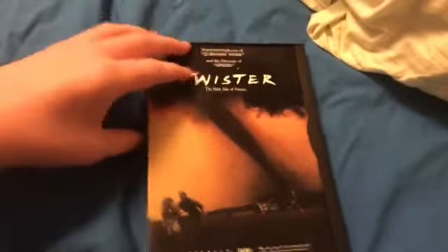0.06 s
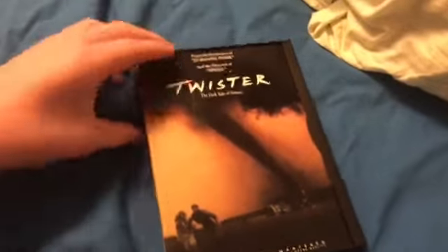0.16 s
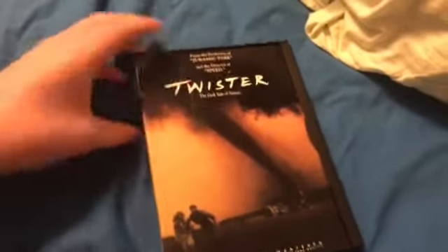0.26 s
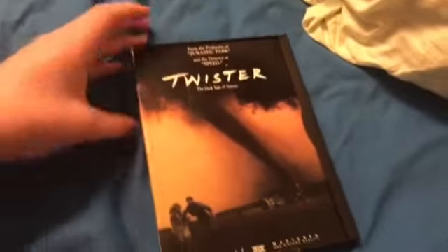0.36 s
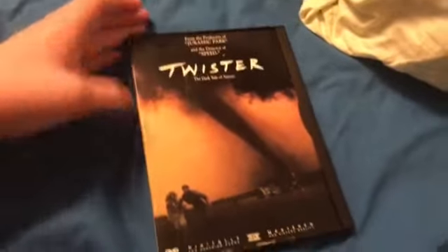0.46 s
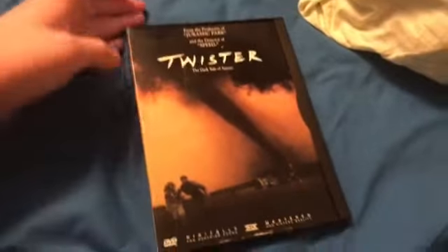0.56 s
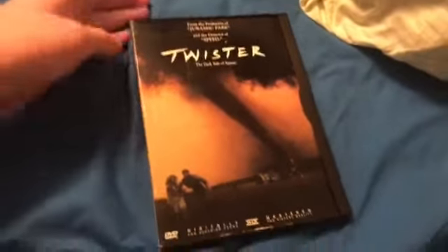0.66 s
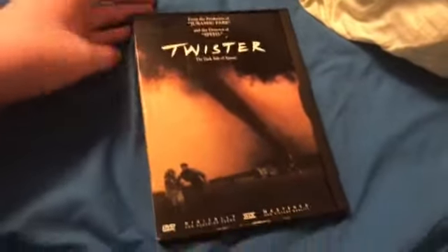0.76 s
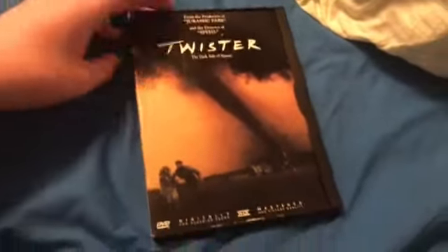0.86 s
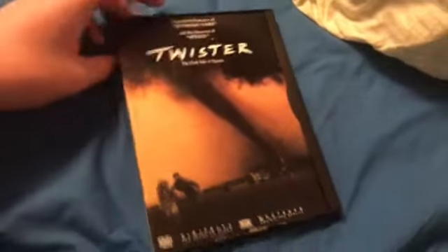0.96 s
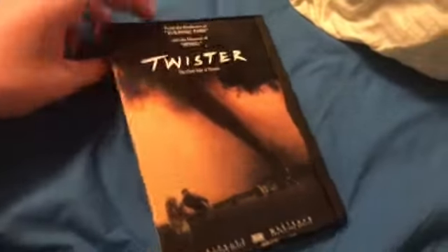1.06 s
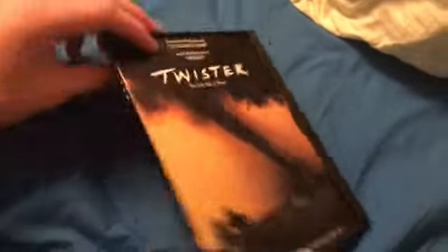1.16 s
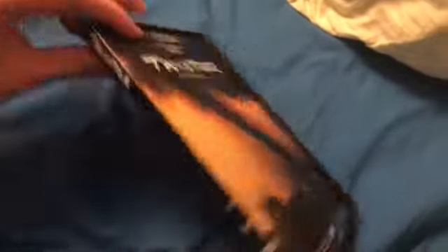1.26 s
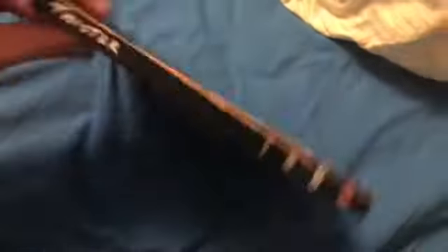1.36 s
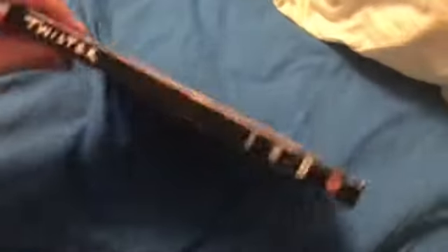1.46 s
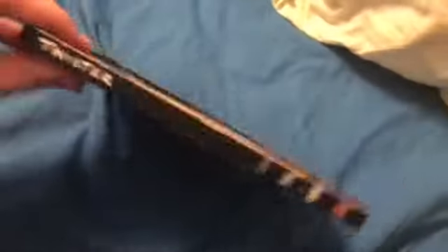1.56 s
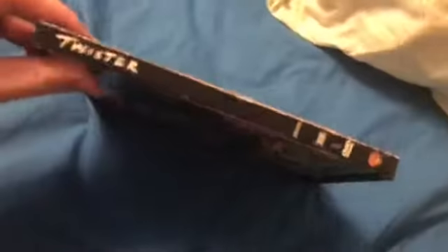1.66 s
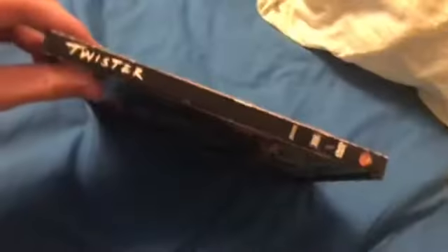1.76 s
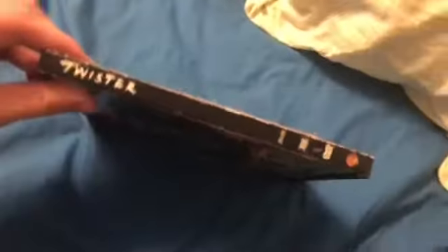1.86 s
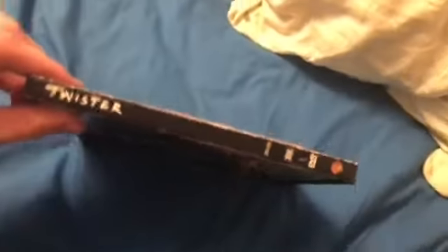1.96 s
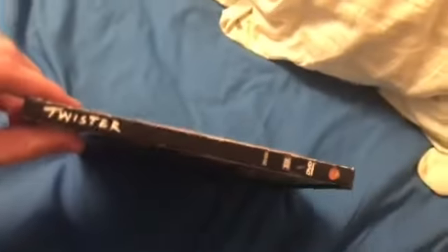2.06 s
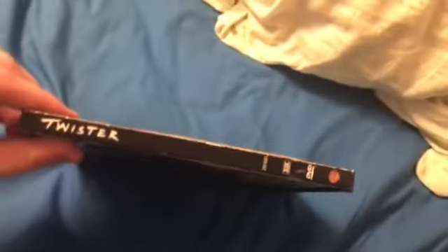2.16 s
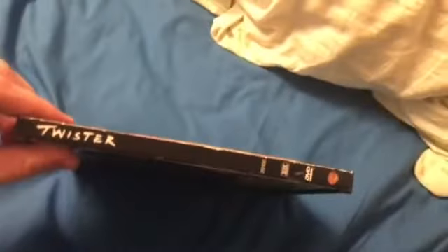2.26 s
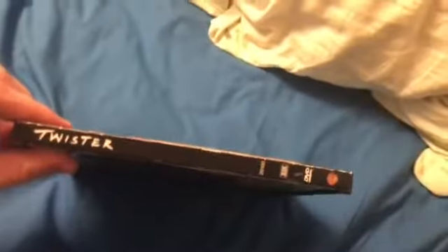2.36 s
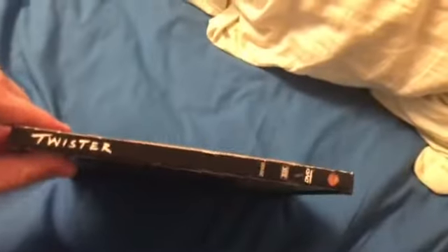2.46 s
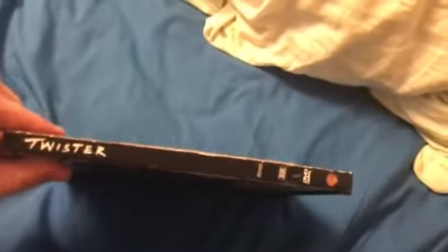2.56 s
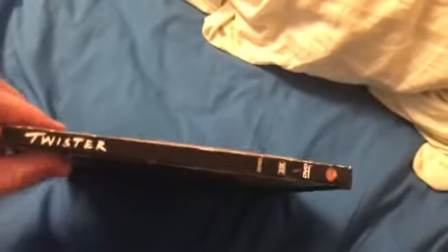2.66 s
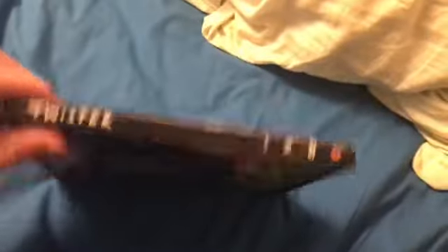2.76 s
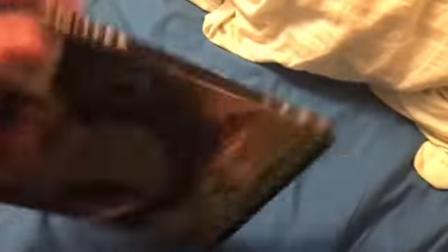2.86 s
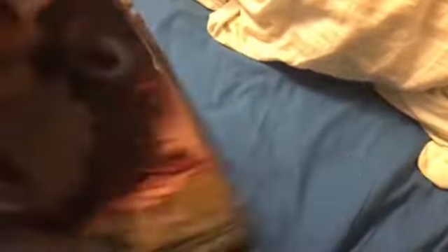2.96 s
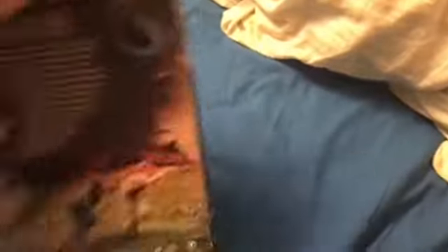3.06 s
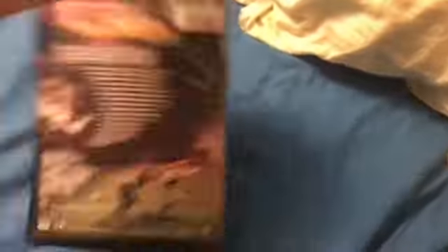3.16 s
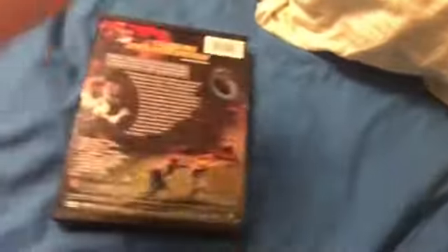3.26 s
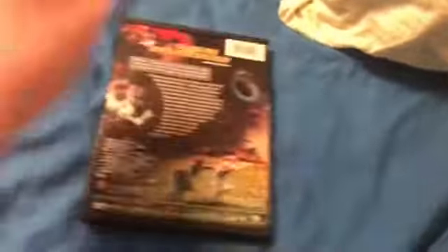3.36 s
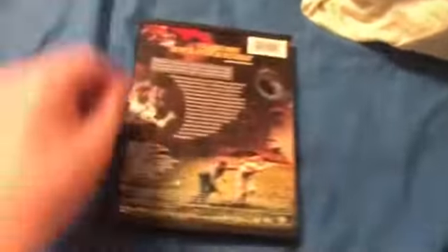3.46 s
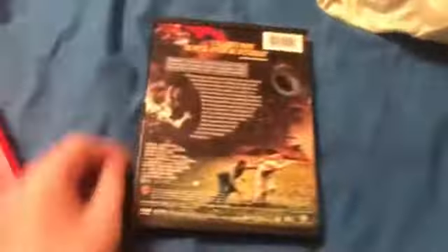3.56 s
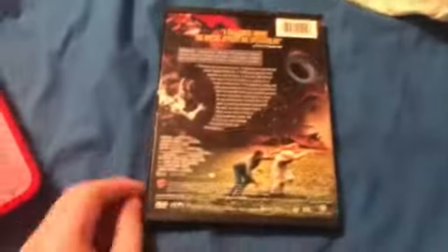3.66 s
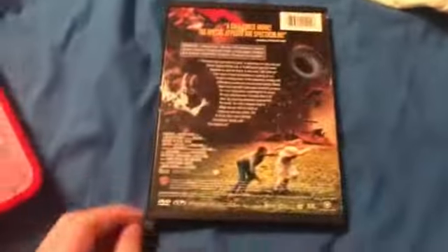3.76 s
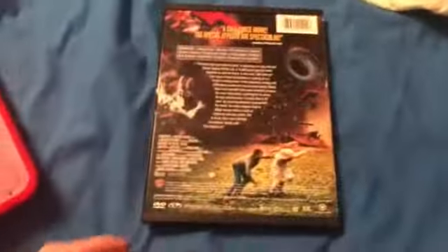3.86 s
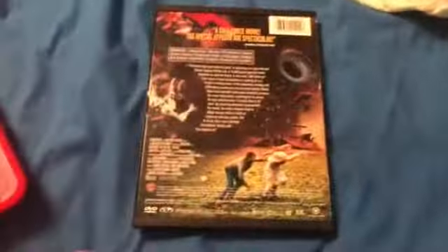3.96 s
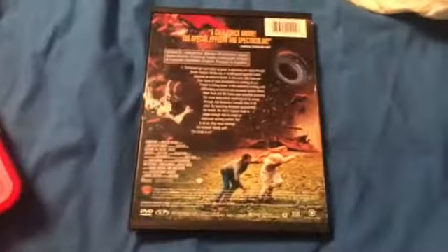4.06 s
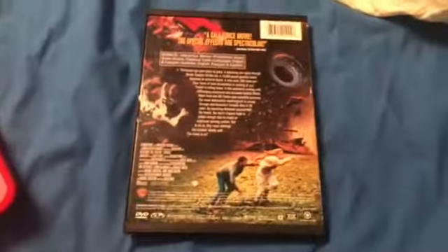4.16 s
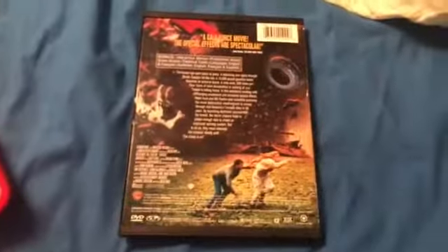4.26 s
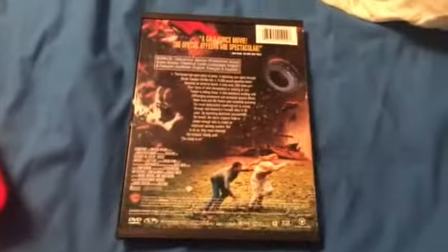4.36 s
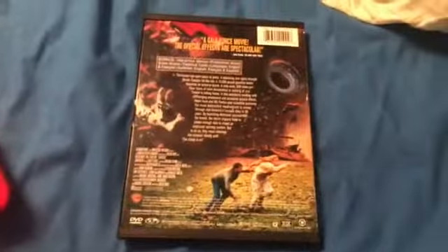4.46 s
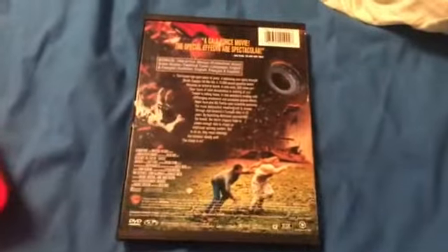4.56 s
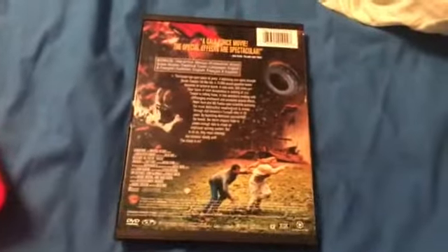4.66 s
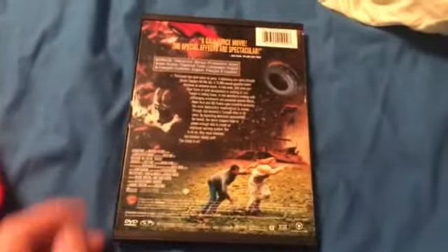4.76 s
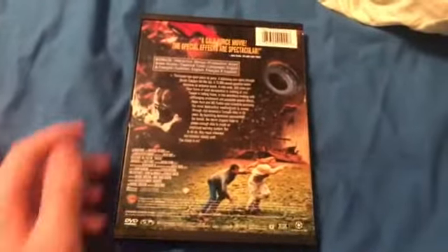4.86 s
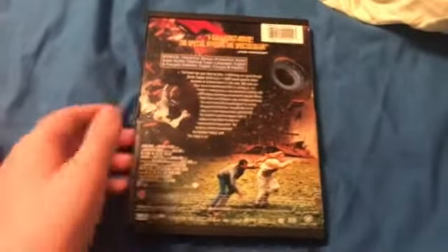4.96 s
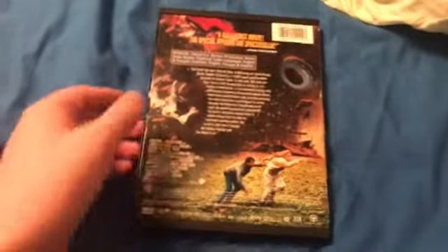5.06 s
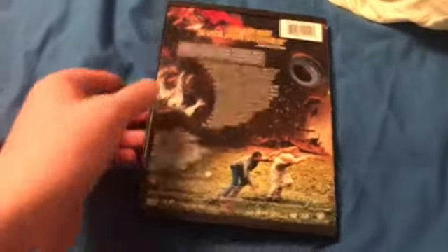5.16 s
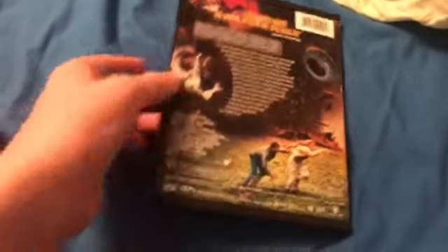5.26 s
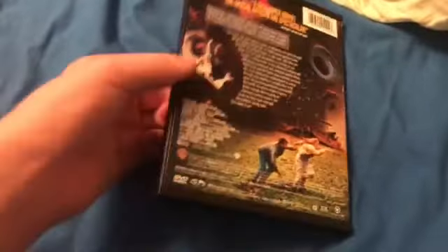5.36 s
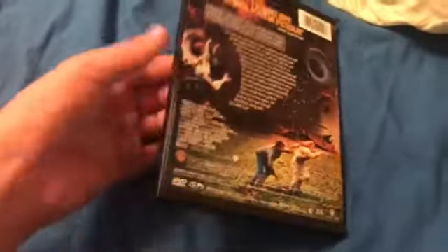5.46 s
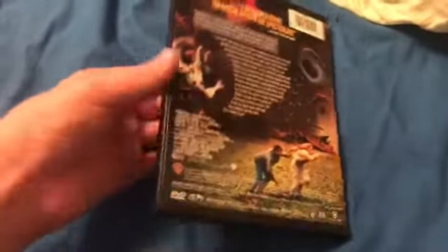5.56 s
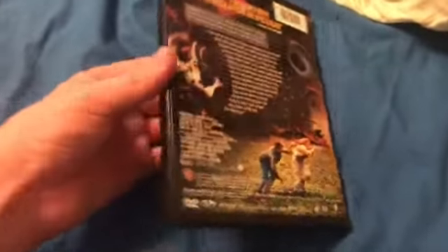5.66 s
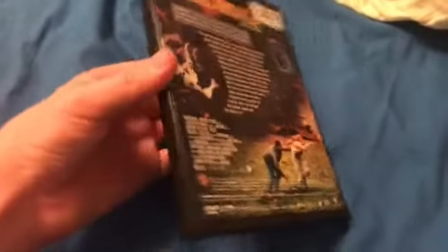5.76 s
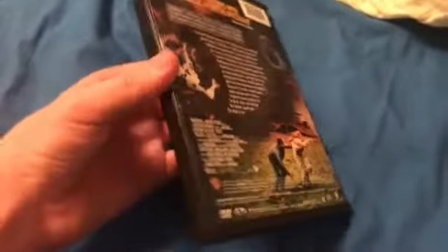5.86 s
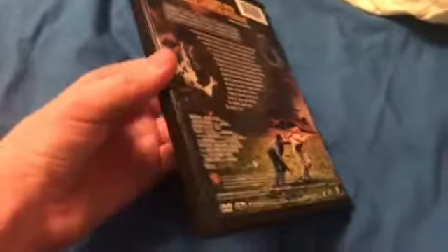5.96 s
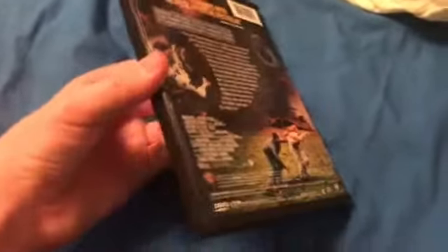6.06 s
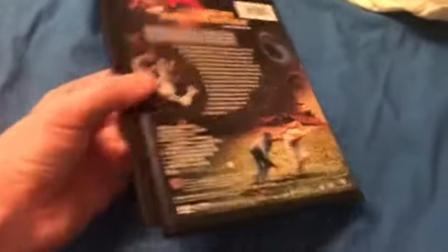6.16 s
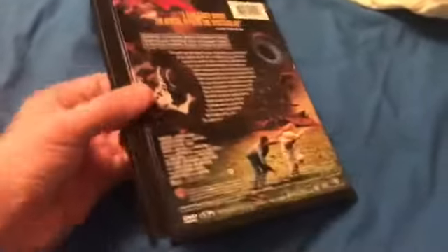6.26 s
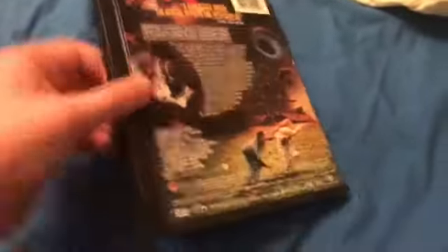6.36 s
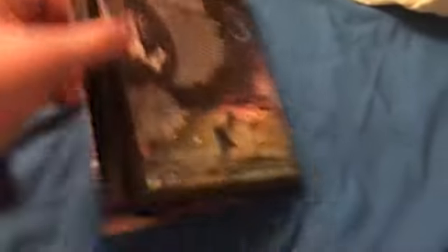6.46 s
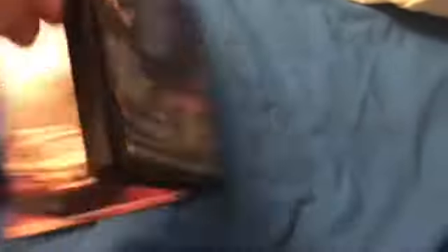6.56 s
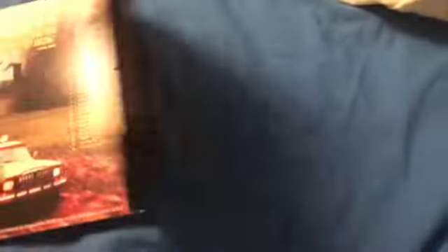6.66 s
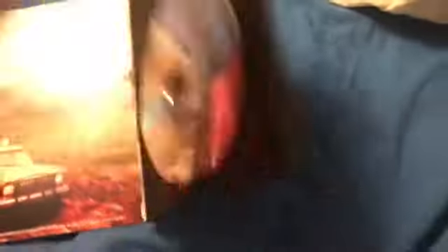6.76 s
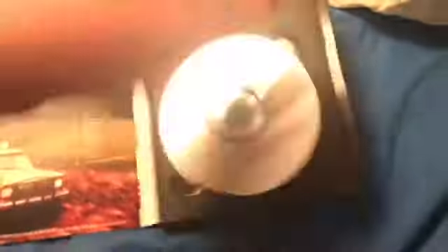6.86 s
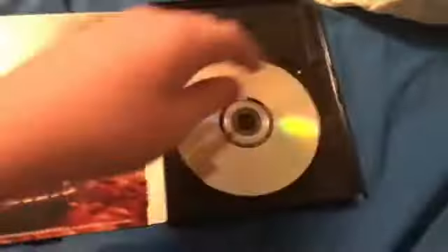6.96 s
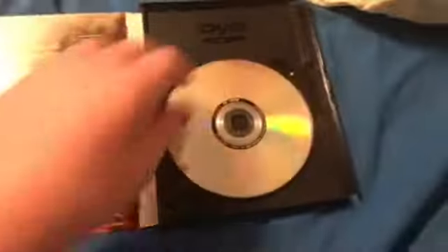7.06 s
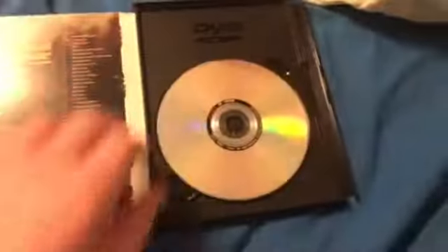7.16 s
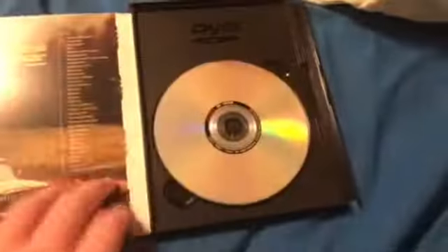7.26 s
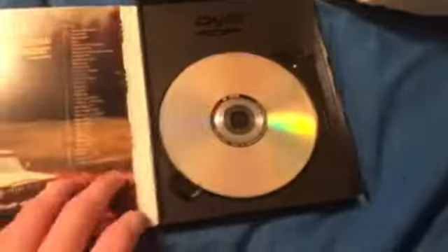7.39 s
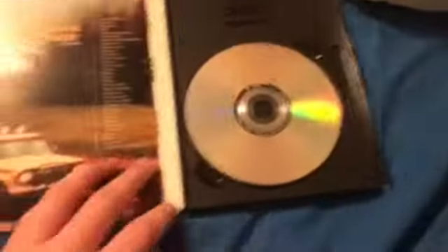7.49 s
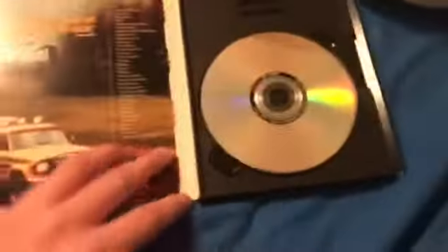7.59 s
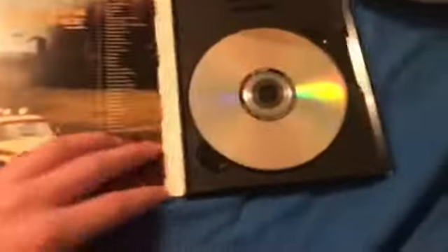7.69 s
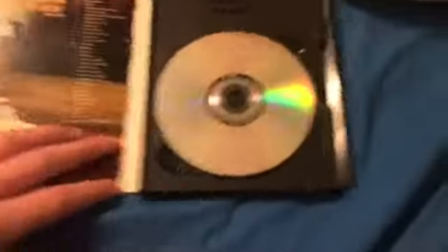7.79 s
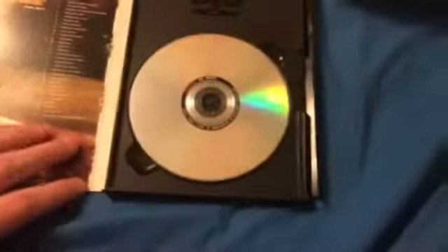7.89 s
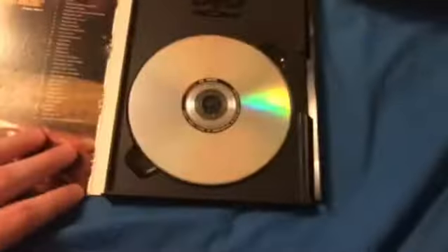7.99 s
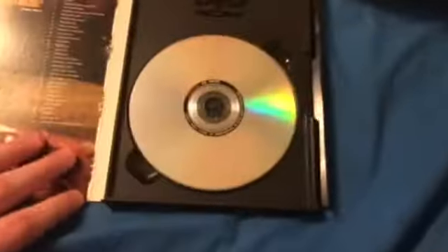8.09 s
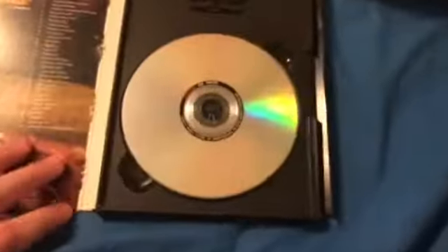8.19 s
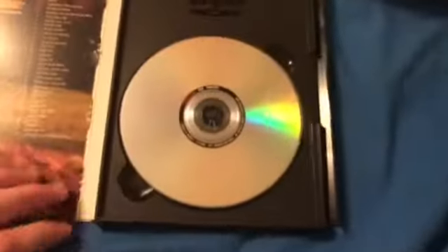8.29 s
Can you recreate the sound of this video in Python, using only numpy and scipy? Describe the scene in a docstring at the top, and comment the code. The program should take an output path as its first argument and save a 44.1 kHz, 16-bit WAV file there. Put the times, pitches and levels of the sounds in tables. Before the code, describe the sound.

Close-miked in a small soft room with faint low rumble, fingers brush a hollow plastic case on a blanket. Light clicks mark it being tilted; it flips and lands with a clack and padded thump. After a pause and more gritty rubbing, the clasp cracks open loudly. The cover flops back with clatter, the disc knocks briefly on its hub, and quiet rustles and small taps finish.

```python
"""In a small, soft, quiet room with a low rumble, a plastic disc case is handled close by on a blanket.
It is picked up, turned over, dropped and snapped open; the cover flops back and loose parts tick.
Rubbing is made from random trains of tiny slips, filtered and swelling with each hand movement.
Ticks and the clasp are short bursts of noise plus ringing plastic; landings are low swings that die away.
The disc is a set of fading sine waves. A short echo surrounds the handling; filtered noise is the room."""
import sys
import numpy as np
from scipy import signal
from scipy.io import wavfile
from scipy.ndimage import uniform_filter1d

SR = 44100
rng = np.random.default_rng(int(sys.argv[2]) if len(sys.argv) > 2 else 0)


def to_wav(s):
    """Save 16-bit WAV."""
    ch = np.atleast_2d(s).T  # columns
    pcm = np.round(np.clip(ch, -1, 1) * 32767)  # PCM
    wavfile.write(sys.argv[1], SR, pcm.astype(np.int16))


N = 367367

# All levels in the tables are relative: the functions may add an overall level.
# Still room, colour of its noise: (frequency [Hz], level [dB])
AIR_COLOUR = [(12, -52), (22, -25.5), (40, -16.5), (64, 1.5), (120, -5), (171, -15), (213, -17), (320, -18),
              (505, -24.5), (857, -25.5), (1400, -29), (1900, -32), (4000, -33), (7500, -38), (9000, -35.5),
              (10400, -40.5), (12500, -37), (15500, -39.5)]
# Hand movements: (start [s], length [s], fastest moment [share of length],
#                  cloth level [dB], skin on shell level [dB])
HAND_MOVES = [(0.0, .72, 0.017, -74.5, -66.5), (0.103, 0.12, 0.28, -60.3, -57),
              (0.517, .83, 0.81, -70.5, -64), (0.954, .122, 0.66, -63, -62),
              (1.145, 0.093, .4, -66.5, -50.5), (1.203, 0.29, .3, -65.5, -62),
              (1.437, 0.49, 0.81, -79, -73), (1.591, 0.14, 0.44, -66.5, -58.5),
              (1.95, 0.23, 0.59, -81.5, -70.5), (2.763, 0.3, 0.28, -67, -61.5),
              (2.989, 0.16, 0.81, -67, -57), (3.169, 0.07, 0.63, -66, -50.5),
              (3.246, 0.11, 0.21, -69.5, -49.5), (3.523, 0.58, 0.35, -71, -65.5),
              (4.655, 0.2, 0.82, -74.5, -66), (4.917, 0.26, 0.17, -69, -58.5),
              (5.119, 0.42, 0.21, -70.5, -59), (5.522, 0.42, 0.32, -72.5, -70),
              (5.901, 0.16, .2, -80, -63.5), (6.026, 0.66, 0.64, -66.5, -63.8),
              (6.598, 0.17, 0.12, -65.5, -65), (6.772, 0.28, 0.28, -70.5, -58.5),
              (7.336, 0.38, 0.52, -63, -71), (7.667, .32, 0.45, -61, -71), (7.76, 0.62, 0.92, -74.5, -70.5)]
# Hands leaning on the mattress: (start [s], length [s], deepest moment [share of length], level [dB])
HAND_PRESSES = [(0.0, 0.1, 0.064, -53), (1.0, 0.055, 0.43, -56.5), (1.60, 0.15, 0.46, -60),
                (2.89, 0.12, .45, -62), (3.17, 0.31, 0.2, -58), (6.9, .28, .15, -60),
                (7.7, 0.84, 0.21, -68)]
# Colour of rubbed cloth: (frequency [Hz], level [dB])
CLOTH_COLOUR = [(100, -3), (350, -1.5), (550, -5.5), (900, -2.5), (1800, -3), (3000, -2), (5000, -5.5),
                (6500, -4.5), (9000, -8), (10400, -10), (12000, -7.5), (15500, -13)]
# Colour of skin on plastic: (frequency [Hz], level [dB])
FINGER_COLOUR = [(100, -6), (500, -3.5), (900, 0.5), (1300, 4.5), (1900, -5.5), (2600, -3), (4500, -13),
                 (9000, -34.5), (15500, -33.5)]
# Colour of shifting padding: (frequency [Hz], level [dB])
BEDDING_COLOUR = [(30, -22), (90, 1.5), (160, -2.5), (300, -7.5), (600, -24), (2000, -40.5)]
# Ringing tones (modes) of the hollow shell: (frequency [Hz], level [dB])
SHELL_MODES = [(205, -23), (370, -25), (548, -21.5), (785, -9), (865, -17.5), (988, -6.5), (1057, -13),
               (1232, -1.5), (1405, -10.5), (1555, -7), (1755, -11), (1906, -0.5), (2205, -9.5), (2490, -5),
               (2610, -7.5), (2790, -12.5), (3140, -24.5), (3600, -24), (4138, -18), (4400, -19),
               (4565, -21.5), (5085, -13.5), (6390, -17), (6760, -19)]
# Light ticks of nails, cover and clasp: (time [s], level [dB], pitch of the struck spot [Hz],
#                                         ring of that spot [dB], hardness [dB per octave])
LIGHT_TICKS = [(.043, -38.5, 1430, 4, 5.5), (0.053, -36.5, 1324, -11, -0.5), (0.226, -42, 1270, -2, -2),
               (0.255, -40.5, 1036, -3, 1.5), (0.268, -38, 1170, 0, -4), (.316, -47, 1330, 4, -5.5),
               (1.142, -40, 1500, -3, 1), (1.149, -32, 900, 5, 3.5), (1.1628, -27.5, 1080, 2, 2.5),
               (3.116, -41, 1500, 7, -2), (3.130, -34, 1960, 4, -0.5), (3.196, -32, 1740, 6, -0.5),
               (3.2637, -26, 1310, -13, -1.5), (3.269, -27, 1040, 8, 1), (3.286, -28.5, 1620, -9, -0.5),
               (3.335, -45, 1040, 10, 2.5), (3.560, -41.5, 1830, -7, -0.5), (4.956, -35, 1210, -5, 2),
               (5.197, -38.5, 2940, -13, 7.5), (5.351, -25.5, 1170, 3.5, 4), (5.359, -32.5, 1300, -3, -.5),
               (5.382, -40, 1180, 16, 0), (5.657, -47, 3730, -12, 13), (5.823, -39, 1220, 1, 5),
               (5.933, -45.5, 1200, 12.5, 4), (6.348, -40, 1130, 1, 3), (6.382, -36.5, 2890, -8, 1.5),
               (6.627, -30.5, 2950, -13, 1), (6.632, -33.5, 1000, -7, 0), (6.642, -23.5, 3704, -4.5, -0.5),
               (6.673, -37.5, 2900, -1.5, -1), (6.842, -30, 3100, -14, 2), (6.850, -30.5, 3970, -6, 6),
               (6.931, -35.5, 705, -10, 1), (6.940, -35, 1460, -4, 2), (6.948, -35.5, 2326, -10, -0.5),
               (7.015, -40, 3610, -7, -0.5), (7.285, -50.5, 896, -.5, 2), (7.324, -46, 1520, -12, -1.5),
               (7.846, -30.5, 1180, -14, -1.5), (7.881, -31.5, 1190, -12.5, -2.5),
               (8.286, -47, 1000, -19.5, 1)]
# Colour of ticks and rattle: (frequency [Hz], level [dB])
TICK_COLOUR = [(60, 7.5), (200, 7), (550, 2), (1200, -2), (2500, -2), (4500, -3), (8000, -13.5),
               (10500, -17), (15500, -26)]
# Stick-slip scrapes and creaks: (start [s], length [s], level [dB], pitch [Hz])
SCRAPES = [(1.006, 0.055, -63, 3760), (1.158, 0.062, -60, 716), (1.264, 0.24, -68.5, 2060),
           (1.615, 0.12, -65.5, 2260), (2.138, 0.12, -59, 141), (2.807, 0.032, -64, 660),
           (2.881, 0.087, -60, 3050), (2.916, 0.044, -58.5, 5790), (2.986, 0.079, -65.5, 1300),
           (4.959, 0.18, -68.5, 1250), (5.414, .027, -70, 4160), (5.581, 0.045, -63, 1226),
           (5.908, .119, -71.5, 5220), (5.918, 0.082, -69.5, 1183), (6.536, 0.045, -57, 1200),
           (6.62, 0.058, -52, 3675), (7.41, .207, -65.5, 2950), (7.554, 0.04, -62, 330)]
# Soft landings on the mattress: (time [s], swing level [dB], pitch [Hz],
#                                 time to fade by 60 dB [s], puff of the padding [dB])
LANDINGS = [(3.266, -21, 57.7, 0.21, -35.5), (3.267, -29.5, 216.6, 0.054, -50),
            (3.562, -56.5, 179, 0.18, -61), (5.356, -33, 105, 0.05, -45), (6.130, -42.5, 99.5, 0.22, -35),
            (6.632, -66, 188.6, 0.057, -38), (6.931, -23.5, 138, 0.056, -34),
            (6.939, -32.5, 51.9, 0.17, -48), (7.017, -48, 109.3, 0.1, -50), (7.288, -42.5, 71.9, 0.15, -56),
            (7.330, -44, 85.5, 0.14, -53.5), (7.743, -34, 128.3, 0.026, -47.5),
            (7.847, -34, 125, 0.04, -42.5), (7.885, -53, 122, 0.05, -48)]
# Colour of the padding's puff: (frequency [Hz], level [dB])
PUFF_COLOUR = [(40, -19.5), (120, -2), (210, 2), (300, -8.5), (400, -9.5), (600, -18), (1500, -25.5),
               (5000, -50)]
# The clasp slips, lets go and strikes its lip: (time [s], level [dB], brightness [dB per octave],
#                                                ring of the shell [dB])
CLASP_RELEASES = [(6.1270, -8.5, -2.5, 7), (6.1326, -0.5, 3.45, 5.5), (6.1331, -5, 0.3, -3)]
# Colour of the clasp's crack: (frequency [Hz], level [dB])
CRACK_COLOUR = [(60, -19), (200, -12), (600, -2), (1100, 12.5), (2100, 1.5), (3200, -6.5), (4300, -9.5),
                (6500, -9.5), (9000, -18), (10500, -30), (15500, -27)]
# The disc rocks on its hub: (time [s], level [dB])
DISC_ROCKS = [(6.830, -25.5), (6.843, -40), (6.851, -13), (6.948, -22), (7.001, -32), (7.015, -18),
              (7.046, -39)]
# Ringing tones of the disc on its hub: (frequency [Hz], level [dB], time to fade by 60 dB [s])
DISC_MODES = [(480, -20, .03), (630, -9.5, 0.062), (721, -2.5, 0.021), (2233, 1.5, 0.036),
              (2960, -0.5, 0.0234), (3360, -3, 0.015)]

AIR_DB = -64.5
WHINE_HZ, WHINE_DB = 8370, -92.5
SPEED_POWER = 0.97  # friction grows with sliding speed to this power
DRAG_DB = -1  # padding dragged along by the sliding cloth
SCRAPE_WIDTH = 0.46  # width of each resonance as a share of its pitch
# Fade constant of a tick's chatter at hardness 0; each HALVING_DB of hardness halves it
CHATTER_S, HALVING_DB = 0.0034, 7.5
LOW_CUT_HZ, EDGE_HZ = 27, 15950
RING = np.arange(8192) / SR  # time axis of one ringing sound [s]
TAPS = 2048  # length of a colour filter [samples]
OCTAVE = np.log2(abs(np.fft.fftfreq(2 * TAPS, 1 / SR)) + 10)  # pitch scale; 10 Hz avoids log of zero


def amp(db):
    """Turns decibels into gain."""
    return 10 ** (np.asarray(db) / 20)


def evened(x):
    """Scales a sound to rms 1."""
    return x / np.sqrt(np.mean(x ** 2) + 1e-20)


def unit(x):
    """Scales a sound to energy 1."""
    return x / np.linalg.norm(x)


def add(mix, s, sound):
    """Mixes a sound in at time s."""
    part = mix[max(round(s * SR), 0):][:len(sound)]
    part += sound[:len(part)]


def response(points, tilt_db=0):
    """Builds a short filter through (Hz, dB) points; the tilt pivots at 2 kHz and is flat below 0.5 kHz."""
    hz, db = np.transpose(points)
    slope = tilt_db * np.maximum(OCTAVE - 11, -2)
    log_gain = np.log(amp(np.interp(OCTAVE, np.log2(hz), db) + slope))
    # minimum phase: the filter responds at once, with nothing before the blow
    spectrum = np.exp(np.conj(signal.hilbert(log_gain)))
    return unit(np.fft.ifft(spectrum).real[:TAPS])


def colour(x, points, tilt_db=0):
    """Filters a sound through (Hz, dB) points."""
    return signal.oaconvolve(x, response(points, tilt_db))[:len(x)]


def resonate(x, hz, width_hz):
    """Lets one resonance of gain 1 sing out of a sound."""
    return signal.lfilter(*signal.iirpeak(hz, hz / width_hz, fs=SR), x)


def air():
    """Room rumble, hiss and a faint electric whine, all filtered from one noise."""
    hiss = rng.standard_normal(N)
    whine = resonate(resonate(hiss, WHINE_HZ, width_hz=270), WHINE_HZ, width_hz=270)
    floor = evened(colour(hiss, AIR_COLOUR))
    return amp(AIR_DB) * floor + amp(WHINE_DB) * evened(whine)


def stroke(rows):
    """Gain of hand movements: each speeds up to its fastest moment and slows to rest."""
    power = np.zeros(N)
    for start, length, crest, db in rows:
        progress = np.arange(0, 1, 1 / (length * SR))
        turn = np.interp(progress, [0, np.clip(crest, .02, .98), 1], [0, np.pi / 2, np.pi])
        gain = amp(db) * np.sin(turn) ** SPEED_POWER
        add(power, start, gain ** 2)
    return np.sqrt(power)


def sliding():
    """How hard the hand and case brush the cloth."""
    return stroke([(s, length, crest, cloth_db) for s, length, crest, cloth_db, _ in HAND_MOVES])


def gripping():
    """How hard the skin rubs the shell."""
    return stroke([(s, length, crest, skin_db) for s, length, crest, _, skin_db in HAND_MOVES])


def slips(per_s, spread_db):
    """A random train of tiny friction slips of uneven size."""
    train = rng.standard_normal(N) * (rng.random(N) < per_s / SR)
    size_db = spread_db * np.minimum(rng.standard_exponential(N), 4)
    return evened(train * amp(size_db))


def wander(x, patchy_db):
    """The contact patch keeps changing, so the colour of a rub drifts at random."""
    z = signal.stft(x.astype(np.float32), nperseg=512)[2]
    patches = uniform_filter1d(rng.standard_normal(z.shape), size=4, axis=0)  # smooth over pitch
    patches = evened(uniform_filter1d(patches, size=16, axis=1))  # smooth over time
    return evened(signal.istft(z * amp(patchy_db * patches))[1][:N])


def cloth(level_db=5):
    """Thousands of threads catch and let go: a fine, bright hiss."""
    threads = colour(slips(per_s=12000, spread_db=-0.5), CLOTH_COLOUR)
    return amp(level_db) * sliding() * wander(threads, patchy_db=1.5)


def ringing(modes):
    """Fading sine tones after a blow; neighbours swing opposite ways."""
    total = np.zeros(len(RING))
    for k, (hz, db, t60) in enumerate(modes):
        fade = amp(db - 60 * RING / t60)
        total += (-1) ** k * fade * np.sin(2 * np.pi * hz * RING)
    return unit(total)


def shell(t60=.048, damping_hz=7000):
    """The ring of the hollow case; the plastic shortens high tones more than low ones."""
    return ringing([(hz, db, t60 / (1 + hz / damping_hz)) for hz, db in SHELL_MODES])


def fingers(level_db=-5, ring=0.21):
    """Skin slips on the plastic in gritty catches, and the hollow shell colours the sound."""
    drag = wander(slips(per_s=1100, spread_db=0.0), patchy_db=5.5) * gripping()
    body = unit(response(FINGER_COLOUR) + ring * shell()[:TAPS])
    return amp(level_db) * signal.oaconvolve(drag, body)[:N]


def bedding(level_db=-2):
    """Dull rustle of the padding as weight shifts on it and the cloth drags it along."""
    weight = np.hypot(stroke(HAND_PRESSES), amp(DRAG_DB) * sliding())
    rustle = evened(colour(slips(per_s=1500, spread_db=3.5), BEDDING_COLOUR))
    return amp(level_db) * weight * rustle


def chatter(decay_s, size=8192):
    """Dense micro-contacts that build up quickly and then fade."""
    age = RING[:size] / max(decay_s, 1e-4)
    envelope = np.exp(-age) * (1 - np.exp(-5 * age))
    return unit(rng.choice([-1., 1.], size) * envelope)


def ticks(level_db=11, sharp=0.31, shell_db=-9, width_hz=240):
    """Small contacts ring the struck spot and the whole shell; harder ones are brighter and shorter."""
    out, body = np.zeros(N), shell()[:TAPS]
    for s, db, hz, ring_db, hard_db in LIGHT_TICKS:
        grind = chatter(CHATTER_S * .5 ** (hard_db / HALVING_DB), size=TAPS)
        contact = colour(sharp * signal.unit_impulse(TAPS) + grind, TICK_COLOUR, hard_db)
        spot = amp(ring_db) * unit(resonate(contact, hz, width_hz))
        whole = amp(shell_db) * unit(signal.fftconvolve(contact, body)[:TAPS])
        add(out, s, amp(level_db + db) * unit(unit(contact) + spot + whole))
    return out


def scrapes():
    """A stuttering contact excites one band of the shell, cover or bed."""
    out, grit = np.zeros(N), slips(per_s=2500, spread_db=2.5)
    for s, length, db, hz in SCRAPES:
        rub = grit[round(s * SR):][:round(length * SR)]
        for _ in range(2):  # two passes sharpen the band
            rub = resonate(rub, hz, SCRAPE_WIDTH * hz)
        fade = signal.windows.tukey(len(rub), .5)
        add(out, s, amp(db) * evened(rub) * fade)
    return out


def thumps(rise_s=0.0053, puff_s=0.0058, puff_gain_db=18.5):
    """The mattress gives in low swings that die away, and a dull puff is pressed from the padding."""
    out, rise = np.zeros(N), 1 - np.exp(-RING / rise_s)
    for s, db, hz, t60, puff_db in LANDINGS:
        swing = -amp(db - 60 * RING / t60) * rise * np.sin(2 * np.pi * hz * RING)
        puff = unit(colour(chatter(puff_s) * rise, PUFF_COLOUR))
        add(out, s, swing)
        add(out, s, amp(puff_gain_db + puff_db) * puff)
    return out


def clasp(crack_db=5, chatter_db=3.5, decay_s=.001, rattle_db=-9.5, rattle_s=.016):
    """Each release is a sharp crack that sets the shell ringing and its loose parts rattling."""
    out, body = np.zeros(N), shell()
    for s, db, bright_db, ring_db in CLASP_RELEASES:
        crack = response(CRACK_COLOUR, bright_db)
        grind = unit(colour(chatter(decay_s), CRACK_COLOUR, tilt_db=bright_db - 2.5))
        rattle = unit(colour(chatter(rattle_s), TICK_COLOUR, tilt_db=0.5))
        after = amp(ring_db) * body + amp(chatter_db) * grind + amp(rattle_db) * rattle
        add(out, s, amp(db + crack_db) * crack)
        add(out, s, amp(db) * after)
    return out


def disc(level_db=-4):
    """The loose disc rings each time it knocks against its hub."""
    out = np.zeros(N)
    for s, db in DISC_ROCKS:
        add(out, s, amp(level_db + db) * ringing(DISC_MODES))
    return out


def room(x, wet_db=-21, t60_low=0.19, t60_high=0.13, delay_s=0.0047):
    """A short, soft echo of fading noise whose treble dies first."""
    taps = rng.standard_normal(2 * len(RING))
    t = np.arange(len(taps)) / SR
    low = signal.sosfilt(signal.butter(2, 3000, fs=SR, output="sos"), taps)
    high = .9 * (taps - low)
    tail = low * amp(-60 * t / t60_low) + high * amp(-60 * t / t60_high)
    echo = signal.oaconvolve(x, unit(tail * (t > delay_s)))[:N]
    return x + amp(wet_db) * echo


def scene():
    """All handling sounds in the room, over the bedding and the quiet air."""
    rubbing = cloth() + fingers() + scrapes()
    knocks = ticks() + thumps() + clasp() + disc()
    return (room(rubbing + knocks) + bedding() + air())[None]


def record(dry):
    """Thins out the deepest bass and removes the highest treble."""
    low_cut = signal.butter(2, LOW_CUT_HZ, "highpass", fs=SR, output="sos")
    thinned = signal.sosfilt(low_cut, dry)
    treble_cut = signal.firwin(511, EDGE_HZ, window=("kaiser", 9), fs=SR)
    return signal.oaconvolve(thinned, treble_cut[None], "same")


dry = scene()
out = record(dry)
to_wav(out)
```